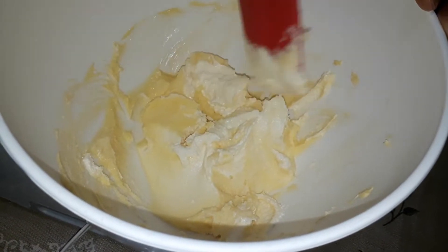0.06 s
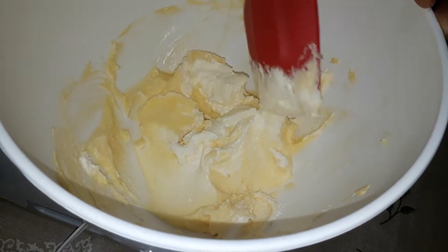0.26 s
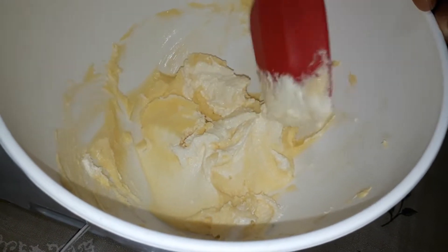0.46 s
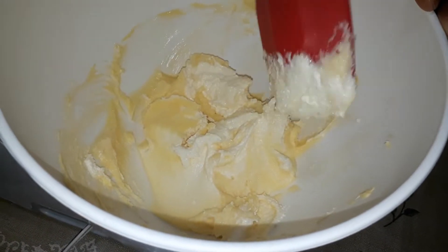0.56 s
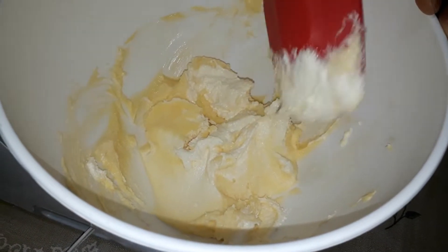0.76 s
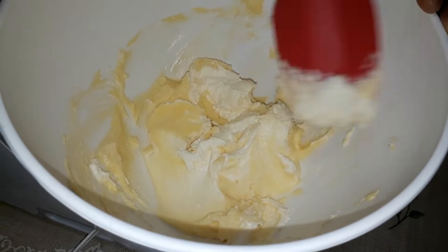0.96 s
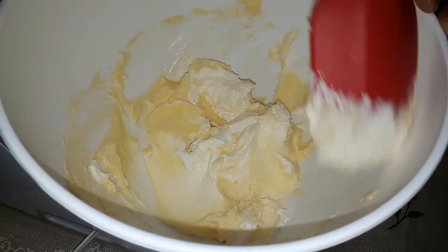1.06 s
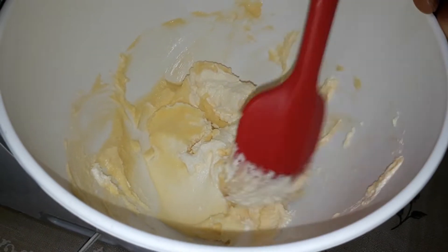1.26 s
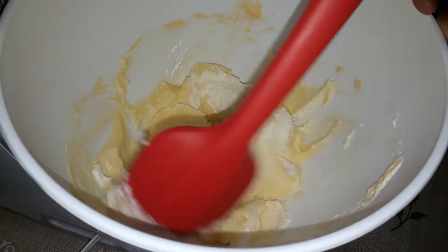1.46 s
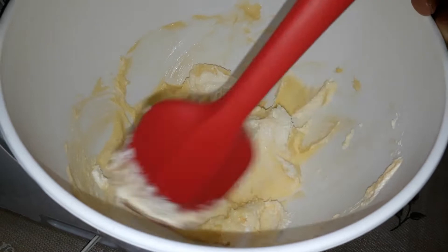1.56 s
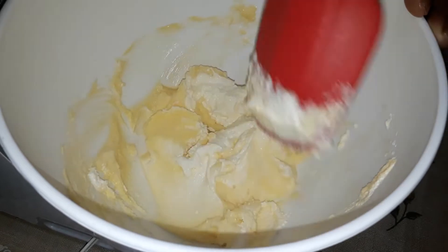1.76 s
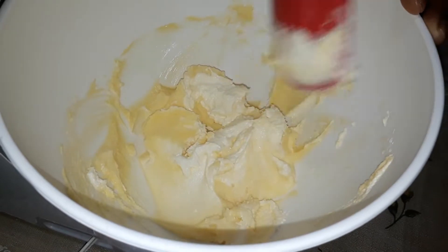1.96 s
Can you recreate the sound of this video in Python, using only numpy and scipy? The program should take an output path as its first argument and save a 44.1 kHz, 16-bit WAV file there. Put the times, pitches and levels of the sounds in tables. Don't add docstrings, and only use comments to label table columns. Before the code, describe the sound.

Four dull hollow spatula knocks on a plastic bowl of thick cream, the last heaviest, then two brief rubbing strokes with a wet smack between them, heard close in a small reverberant kitchen over faint appliance hum.

```python
import sys
import numpy as np
from scipy import signal
from scipy.fft import rfft, irfft
from scipy.io import wavfile

SR = 44100
rng = np.random.default_rng(int(sys.argv[2]) if len(sys.argv) > 2 else 0)


def output_pcm(signal):
    pcm = np.clip(np.atleast_2d(signal).T, -1, 1) * 32767
    wavfile.write(sys.argv[1], SR, np.round(pcm).astype(np.int16))


def linear_from_db(decibels):
    return 10 ** (np.asarray(decibels, float) / 20)


N = 88200


def rms_one(x):
    return x / np.sqrt(np.mean(x ** 2) + 1e-20)


def at_hz(points, hz):
    p = np.array(points)
    return np.interp(np.log(hz), np.log(p[:, 0]), p[:, 1])


def colour(x, spectrum):
    hz = np.arange(1, len(x) // 2 + 2) * SR / len(x)
    return irfft(rfft(x) * linear_from_db(at_hz(spectrum, hz)), len(x))


def butterworth(x, order, hz, kind):
    return signal.sosfilt(signal.butter(order, hz, kind, fs=SR, output="sos"), x)


def peak(x, hz, width_hz):
    r = np.exp(-np.pi * width_hz / SR)
    zeros = np.array([1, 0, -1]) * (1 - r * r) / 2
    return signal.lfilter(zeros, [1, -2 * r * np.cos(2 * np.pi * hz / SR), r * r], x)


def double_peak(x, hz, width_hz):
    return peak(peak(x, hz, width_hz), hz, width_hz)


def ring(impulses, hz, t60):
    r = 1000 ** (-1 / (t60 * SR))
    w = 2 * np.pi * hz / SR
    return signal.lfilter([0, np.sin(w)], [1, -2 * r * np.cos(w), r * r], impulses + 1e-18)


def burst(start, rise, fall):
    t = np.maximum(np.arange(N) / SR - start, 0)
    return (1 - np.exp(-(t / rise) ** 2)) * np.exp(-t / fall)


def clicks(s, db):
    x = np.zeros(N)
    x[(np.asarray(s) * SR).astype(int)] = linear_from_db(db)
    return x


def drift(rate):
    r = np.exp(-2 * np.pi * rate / SR)
    return rms_one(signal.lfilter([1], [1, -2 * r, r * r], rng.standard_normal(N)))


# (frequency [Hz], density [dB per Hz])
HISS_SPECTRUM = [(60, -19), (110, -2), (210, -4.5), (320, -10), (1200, -17.5), (2300, -18), (5200, -32.5),
                 (16000, -44)]
# (time [s], level [dB])
HISS_SWELL = [(0, 4.5), (.2, -0.5), (1.0, 1.5), (1.75, -2.25), (2, -0.9)]
# (frequency [Hz], width [Hz], level [dB])
APPLIANCE = [(6100, 380, -85), (6410, 1000, -78), (115.3, 12, -79), (233.8, 6.6, -71.5), (347.4, 19, -72.5)]
# (time [s], frequency [Hz], level [dB], length [s])
SQUEAKS = [
    (1.775, 4240, -77, .04),
    (1.9, 4680, -83, .08),
]
HISS_DB = -59.5


def air():
    t = np.arange(N) / SR
    hiss = rms_one(colour(rng.standard_normal(N), HISS_SPECTRUM))
    out = hiss * linear_from_db(HISS_DB + np.interp(t, *np.transpose(HISS_SWELL)))
    noise = rng.standard_normal(N)
    for hz, width, db in APPLIANCE:
        out = out + linear_from_db(db) * rms_one(double_peak(noise, hz, width))
    for s, hz, db, length in SQUEAKS:
        tone = rms_one(peak(peak(noise, hz, 90), hz, 81))
        out = out + linear_from_db(db) * np.exp(-((t - s) / length) ** 2) * tone
    return out


# (time [s], level [dB], centre frequency [Hz], length [s])
SMACKS = [
    (0.084, -55.5, 2320, 0.041),
    (0.263, -46, 8000, 0.0065),
    (0.29, -49, 5000, 0.014),
    (0.727, -49, 7200, 0.0094),
    (1.379, -35, 2880, 0.014),
    (1.823, -66, 6850, .006),
    (0.753, -60, 14000, .004),
]


def smacks():
    noise = rng.standard_normal(N)
    out = 0
    for s, db, hz, length in SMACKS:
        crackle = rms_one(peak(noise, hz, 0.5 * hz))
        out = out + linear_from_db(db) * burst(s, 0.35 * length, 0.64 * length) * crackle
    return out


# (frequency [Hz], t60 [s])
ROOM_T60 = [(50, 0.21), (120, 0.43), (300, 0.48), (600, .27), (1500, 0.39), (4000, 0.43), (10000, 0.41)]
ROOM_GAP_S = 0.0022


def kitchen(x, spectrum):
    length = SR * 3 // 4
    t = np.arange(length) / SR
    white = rng.standard_normal((2, length))
    edges = 40 * 2 ** np.arange(0, 9.1, .5)
    answer = 0
    for k, (low, high) in enumerate(zip(edges, edges[1:])):
        hz = np.sqrt(low * high)
        band = butterworth(white[k % 2], 2, [low, high], "band")
        answer = answer + linear_from_db(at_hz(spectrum, hz) - 60 * t / at_hz(ROOM_T60, hz)) * band
    answer = answer * np.clip(t / ROOM_GAP_S - 1, 0, 1)
    return signal.fftconvolve(x, answer / np.sqrt(np.sum(answer ** 2)))[:N]


# (time [s], peak level [dB], slap level [dB], slap delay [s])
KNOCKS = [
    (0.2411, -14, -22, 0.0027),
    (0.4695, -14.5, -26.5, 0.001203),
    (0.6676, -14.5, -26.5, 0.0024),
    (0.8536, -12, -25, 0.0013),
]
# (frequency [Hz], level [dB])
BOWL = [(194, -9), (301, -1), (385, -1.5), (460, -15), (510, -11.5), (614, -17), (694, -6), (813, -44),
        (1206, -5), (1790, -2), (2350, -47), (2700, 1.5)]
BOWL_T60_S = [.2, .19, .12, .12, .1, .08, .06, .06, .045, .03, .025, .025]
# (delay [s], level [dB])
ECHOES = [(.0042, -4), (.0063, -2), (.0085, -2.5), (.0108, -1.5), (.013, -8), (.0205, -12)]
# (frequency [Hz], density [dB per Hz])
SLAP = [(530, -45), (900, 5), (2500, -5.5), (3510, -15.5), (4050, -9.5), (5280, -25), (7770, -13.5),
        (11000, -30.5), (16000, -19)]
BOWL_DB, MODE_SCATTER_DB, ECHO_SCATTER_DB = -11, 3, 4.5
THUMP_HZ, THUMP_T60_S, THUMP_DB = 480, .007, -2.5
RIM_CUT_HZ, CONTACT_HZ = 179, 1350
COUNTER_HZ, COUNTER_DB, COUNTER_RISE_S, COUNTER_FALL_S = 125.7, -24, 0.0072, 0.066
SLAP_RISE_S, SLAP_FALL_S = 0.00053, 0.0048


def knocks():
    s, db, slap_db, lag = np.transpose(KNOCKS)
    t = np.arange(N) / SR
    scatter_db = MODE_SCATTER_DB * rng.standard_normal((len(s), len(BOWL)))
    uneven_db = ECHO_SCATTER_DB * rng.standard_normal((len(s), len(ECHOES)))
    bowl = 0
    for k, (hz, level_db) in enumerate(BOWL):
        strikes = clicks(s, db + BOWL_DB + level_db + scatter_db[:, k])
        bowl = bowl + ring(strikes, hz, BOWL_T60_S[k])
    thumps = clicks(s, db)
    for k, (delay, echo_db) in enumerate(ECHOES):
        thumps = thumps + clicks(s + delay, db + echo_db + uneven_db[:, k])
    bowl = bowl + linear_from_db(THUMP_DB) * ring(thumps, THUMP_HZ, THUMP_T60_S)
    out = -butterworth(bowl, 2, [RIM_CUT_HZ, CONTACT_HZ], "band")
    slap_noise = rms_one(colour(rng.standard_normal(N), SLAP))
    for start, level, slap_level, delay in zip(s, db, slap_db, lag):
        boom = burst(start, COUNTER_RISE_S, COUNTER_FALL_S) * np.sin(2 * np.pi * COUNTER_HZ * (t - start))
        slap = burst(start + delay, SLAP_RISE_S, SLAP_FALL_S) * slap_noise
        out = out + linear_from_db(level + COUNTER_DB) * boom + linear_from_db(slap_level) * slap
    return out


# (frequency [Hz], level [dB])
KNOCK_TAIL = [(45, 3), (110, -3), (300, 5), (550, 6), (1100, -8.5), (2300, -11), (5000, -32.5),
              (14000, -37.5)]
ROOM_DB, SLAP_SPLIT_HZ = 12.5, 2000


def knock_tails():
    s, db, slap_db, lag = np.transpose(KNOCKS)
    slap_feed_db = slap_db - slap_db.mean() + db.mean()
    low = butterworth(clicks(s, db + ROOM_DB), 1, SLAP_SPLIT_HZ, "low")
    high = butterworth(clicks(s + lag, slap_feed_db + ROOM_DB), 1, SLAP_SPLIT_HZ, "high")
    return kitchen(low + high, KNOCK_TAIL)


GRAINS_PER_S, GRAIN_SPREAD_DB, JUDDER_DB, JUDDER_PER_S = 11000, 2.5, 1.7, 80


def grains():
    size = linear_from_db(GRAIN_SPREAD_DB * np.minimum(rng.exponential(1, N), 4)) * rng.choice([-1, 1], N)
    return (rng.random(N) < GRAINS_PER_S / SR) * size * linear_from_db(JUDDER_DB * drift(JUDDER_PER_S))


# (time [s], rubbing level [dB], wall flexing [dB], edge hiss [dB], sheared cream [dB])
STROKES = [
    [(1.055, -93, -18, 4, -12), (1.074, -52, -1.5, 2, -6), (1.095, -52, -12, -10, -8),
     (1.118, -50.5, -11, -3.5, -7), (1.15, -47.5, -12, -8, -8), (1.195, -40.5, -5.5, -4, -6),
     (1.232, -41, -17, -3.5, -9.5), (1.247, -61, -14, -5, -3)],
    [(1.374, -53.5, -13, -3, -7), (1.389, -37.5, -30, -7, -12), (1.405, -44.5, -10.5, -10, -7),
     (1.435, -49, -11, -2.5, -9), (1.452, -44, -17, -13, -8), (1.48, -43, -18, -9, -8),
     (1.51, -38, -11, -11.5, -3.5), (1.548, -48, -6.5, -3, 4.5), (1.575, -58, -21, -8, -9)],
]
# (frequency [Hz], width [Hz], level [dB])
WALL = [(770, 250, -10), (1200, 130, -7), (1740, 240, -2), (1920, 240, -1.5), (2480, 320, -1),
        (2760, 300, -4), (3450, 800, -9), (4300, 900, -12)]
# (frequency [Hz], density [dB per Hz])
EDGE_HISS = [(2500, -3), (3500, -7), (4600, -12.5), (6500, -20), (9000, -1.5), (11500, -11), (14500, -4),
             (16000, -4.5)]
FLEX_HZ, FLEX_WIDTH_HZ = 520, 630
CREAM_HZ, CREAM_WIDTH_HZ = 6050, 3800
WANDER_DB, WANDER_PER_S = 1.8, 25
EDGE_S = .004


def strokes():
    t = np.arange(N) / SR
    slips = grains()
    wall = 0
    for k, (hz, width, db) in enumerate(WALL):
        level = linear_from_db(db + WANDER_DB * drift(WANDER_PER_S))
        wall = wall + (-1) ** k * level * peak(slips, hz, width)
    wall = rms_one(wall)
    hiss = rms_one(butterworth(colour(grains(), EDGE_HISS), 2, 2800, "high"))
    flex = rms_one(double_peak(grains(), FLEX_HZ, FLEX_WIDTH_HZ))
    cream = rms_one(double_peak(grains(), CREAM_HZ, CREAM_WIDTH_HZ))
    out = 0
    for rows in STROKES:
        s, db, *shares_db = np.transpose(rows)
        mix = wall
        for share_db, layer in zip(shares_db, (flex, hiss, cream)):
            mix = mix + linear_from_db(np.interp(t, s, share_db)) * layer
        fade = np.clip(np.minimum(t - s[0], s[-1] - t) / EDGE_S, 0, 1)
        out = out + fade * linear_from_db(np.interp(t, s, db)) * mix
    return out


# (frequency [Hz], level [dB])
ROOM_COLOUR = [(100, -5), (400, -12), (1500, 1), (5000, -6.5), (14000, -0.5)]
RUB_ROOM_DB = -9.5


def scene():
    rub = strokes() + smacks()
    knocking = knocks() + knock_tails()
    rub_tail = kitchen(linear_from_db(RUB_ROOM_DB) * rub, ROOM_COLOUR)
    return (knocking + rub + rub_tail + air())[None]


def low_pass(x):
    return signal.sosfilt(signal.butter(12, 16610, fs=SR, output="sos"), x)


# (frequency [Hz], width [Hz], added share)
MIC = [(5170, 2560, -0.27), (9330, 310, 0.49)]
MIC_LOW_HZ, CUTOFF_HZ = 35, 15900
OFFSET = -.0005


def record(dry):
    x = butterworth(dry, 2, MIC_LOW_HZ, "high")
    x = x + sum(share * peak(x, hz, width) for hz, width, share in MIC)
    x = signal.sosfilt(signal.cheby1(10, 1, CUTOFF_HZ, fs=SR, output="sos"), x)
    return low_pass(x + OFFSET)


dry = scene()
out = record(dry)
output_pcm(out)
```